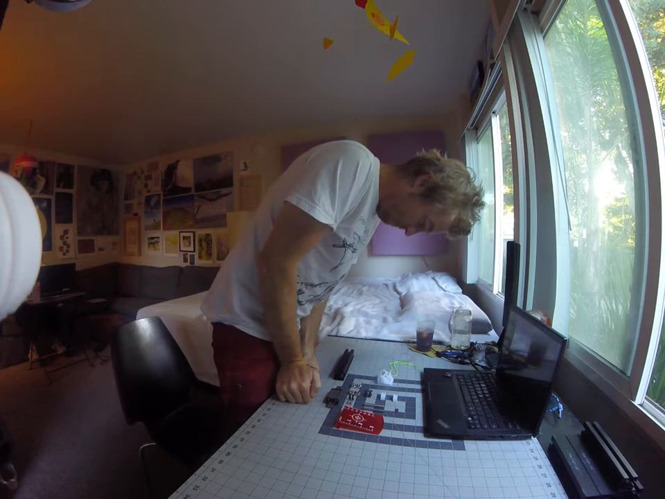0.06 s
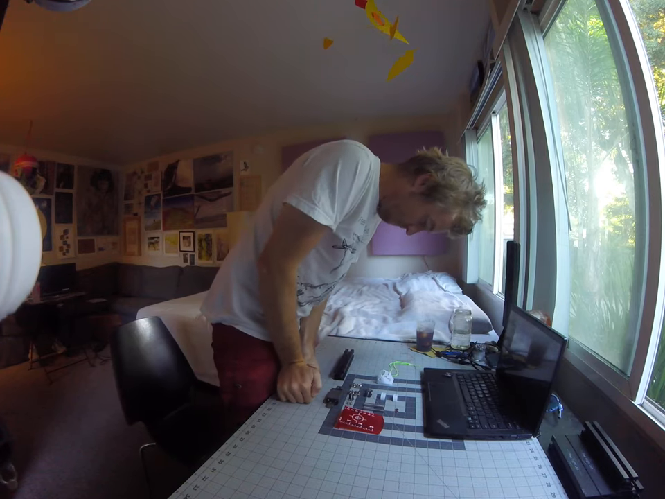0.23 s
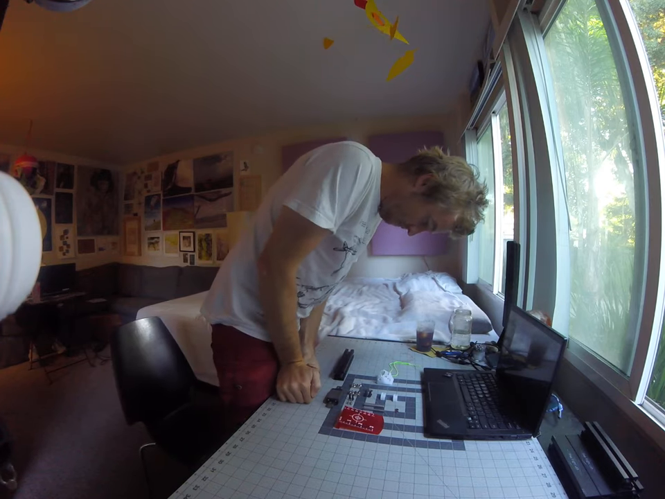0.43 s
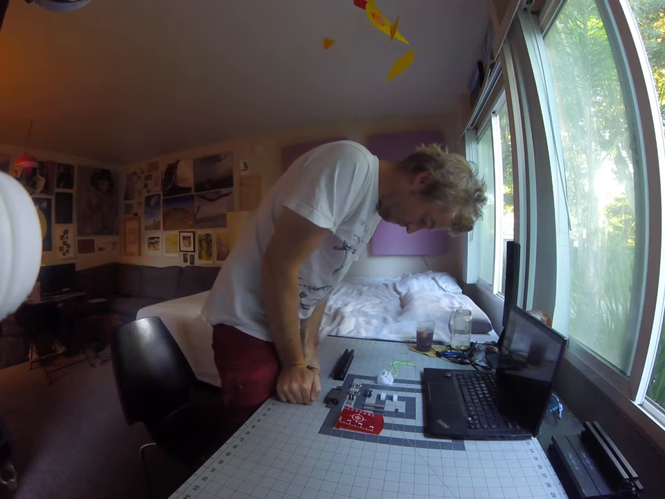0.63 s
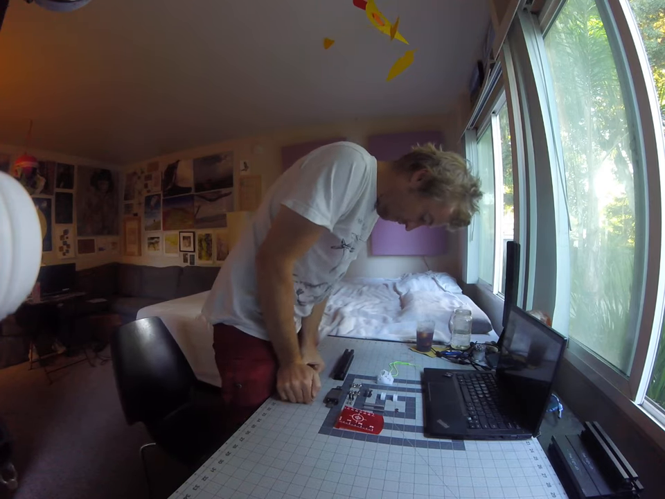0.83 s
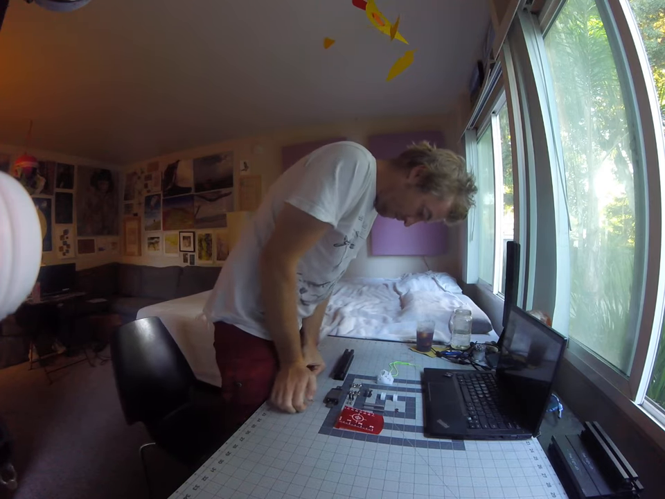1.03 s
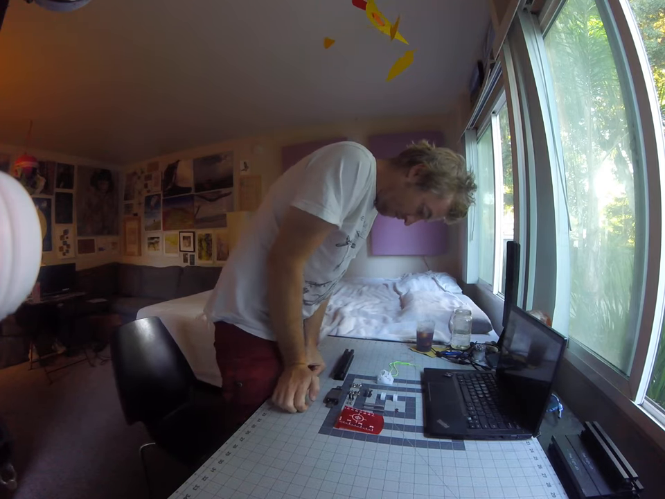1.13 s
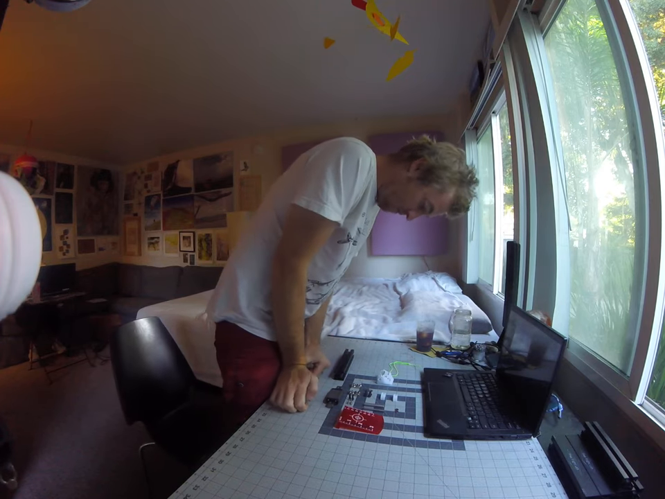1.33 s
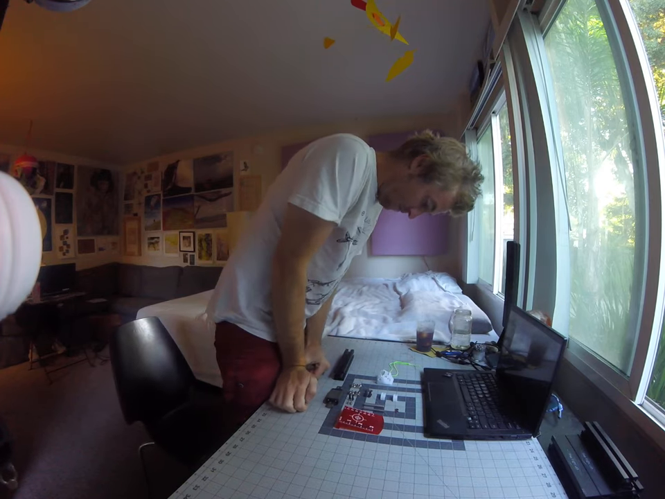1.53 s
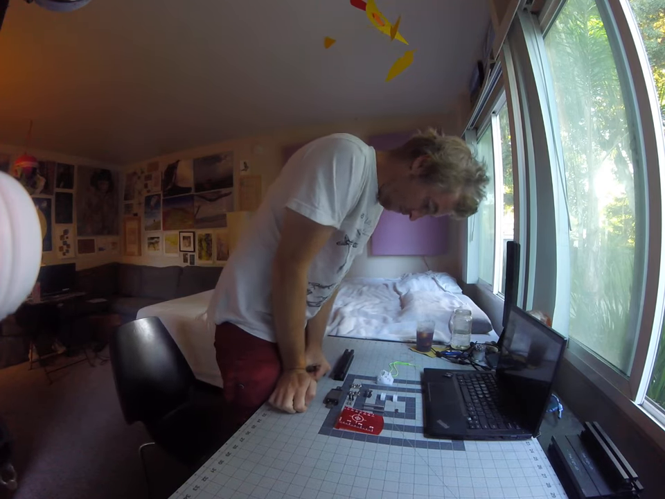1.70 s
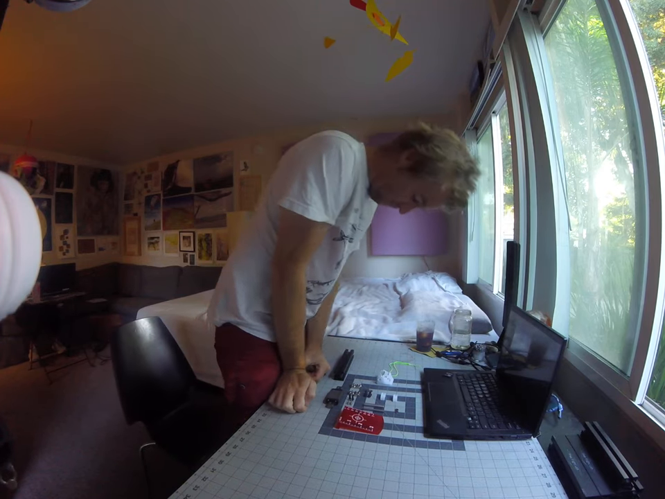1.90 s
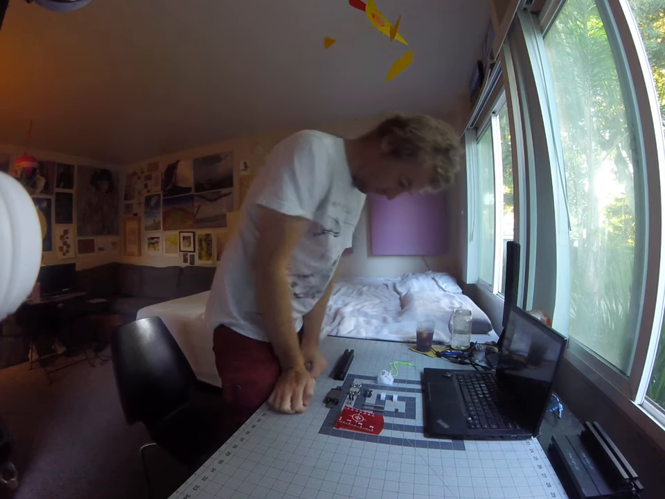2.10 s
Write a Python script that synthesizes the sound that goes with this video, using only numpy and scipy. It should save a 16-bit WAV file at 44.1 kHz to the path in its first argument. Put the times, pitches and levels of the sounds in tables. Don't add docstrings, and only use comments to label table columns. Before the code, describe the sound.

Dull deep thumps on a desk top as hands press a part home, with one sharp rattling snap

```python
import sys
import numpy as np
from scipy import signal
from scipy.fft import rfft, irfft
from scipy.io import wavfile
from scipy.ndimage import uniform_filter1d

SR = 44100
rng = np.random.default_rng(int(sys.argv[2]) if len(sys.argv) > 2 else 0)


def to_wav(sig):
    pcm = np.clip(np.atleast_2d(sig), -1, 1) * 32767
    pcm = np.round(pcm).astype(np.int16)
    wavfile.write(sys.argv[1], SR, pcm.T)


def voltage_ratio(level):
    return 10 ** (np.asarray(level, float) / 20)


N = 94815

# start in seconds, boom in dB, drum in dB, direction (-1 down, 1 up).
SHOVES = [(0.214, -19, -24.5, -1), (0.2246, -13, -18, -1), (0.268, -24, -27.5, 1), (0.324, -32, -33.5, 1),
          (0.432, -51, -58, 1), (0.558, -61, -36.5, 1), (.582, -31.5, -46, -1), (0.601, -64, -23, -1),
          (0.619, -20.5, -25, 1), (0.639, -20, -26.5, -1), (0.715, -29, -46, -1), (.79, -35.5, -41, 1),
          (0.839, -39.5, -68, -1), (0.974, -38.5, -37, 1), (1.031, -48, -62, 1), (1.117, -40, -36.5, 1),
          (1.137, -33, -41, -1), (1.42, -43, -48, 1), (1.566, -38, -38, 1), (1.585, -28, -34.5, -1),
          (1.627, -24.5, -34, 1), (1.648, -46, -30, -1), (1.659, -22, -27, 1), (1.718, -26.5, -55, -1),
          (1.739, -18.5, -17, 1), (1.744, -20.5, -49, -1), (1.798, -55, -36, 1)]
# pitch in Hz, level in dB, 60 dB decay in seconds.
BOOM_MODES = [(64.7, -3.5, 0.22), (65.2, 4, 0.093)]
# pitch in Hz, level in dB, 60 dB decay in seconds.
DRUM_MODES = [(126, 5, 0.059), (154, -23.5, 0.11)]
# start in seconds, level in dB, direction (-1 or 1).
SWAYS = [
    (0.222, -30, 1),
    (0.329, -35.5, 1),
    (0.635, -30, -1),
    (1.159, -40.5, -1),
    (1.402, -42.5, 1),
    (1.607, -37, -1),
    (1.694, -44, 1),
    (1.767, -28, 1),
    (1.908, -32.5, 1),
]
SWAY_HZ, SWAY_T60_S, SWAY_RISE_S = 29.58, 0.76, 0.0048
SHOVE_RISE_S, PALM_S = 0.0038, 0.0059

# start in seconds, level in dB, contact in milliseconds.
SNAP_HITS = [
    (.9741, -25, .13),
    (.9772, -33, .15),
    (.979, -27, .25),
    (.9813, -26, .2),
    (.987, -37, .2),
]
# pitch in Hz, level in dB, 60 dB decay in seconds.
PULLEY_MODES = [(410, -10, .025), (570, -2, .03), (795, -5, .03), (985, -5, .035), (1228, -3, .035),
                (1566, -12, .025), (1865, -15, .025), (2150, -14, .02), (2400, -16, .02), (2850, -19, .02),
                (5200, -26, .012)]
SNAP_DB, TICK_DB = -7.5, -2

# start in seconds, thud in dB, scrape in dB, scrape length in seconds,
# tone of the spot in Hz.
KNOCKS = [(0.2146, -32, -47, 0.015, 407), (.228, -39.5, -57, 0.042, 290), (0.597, -64, -56.5, 0.0091, 400),
          (0.608, -48, -53, 0.039, 400), (0.769, -42, -53.5, 0.0049, 546), (.79, -51, -63.5, 0.016, 450),
          (1.122, -59, -64.5, 0.031, 372), (1.583, -71, -68, 0.035, 400), (1.6538, -44, -49, 0.0074, 425),
          (1.738, -43.5, -60, 0.0058, 390), (1.76, -63, -60.5, 0.013, 900)]
# pitch in Hz, level in dB, 60 dB decay in seconds.
WOOD_MODES = [(285, -4, .07), (400, 0, .06), (460, -6, .05), (570, 0, .05), (630, -4, .05), (800, -8, .045),
              (960, -6, .045)]
# frequency in Hz, level in dB.
GRIT = [(400, -30), (750, 7.5), (1350, 3), (2000, -1), (3200, -9.5), (3700, -16), (5000, -39)]
BOUNCES_PER_S, BOUNCE_DB, BOUNCE_SPREAD_DB = 450, -5, 5
SPOT_DB_PER_OCT = 14
SCRAPE_RISE, SCRAPE_GRAIN_DB = 0.2, 2.5

# start in seconds, length in seconds, level
# in dB, start and end pitch in Hz.
CREAKS = [
    (0.034, 0.0079, -55, 1390, 1250),
    (0.268, 0.093, -54, 257.6, 227),
    (1.774, 0.047, -52.5, 228, 310),
]

# time in seconds, level in dB.
TREMOR_LEVEL = [
    (0.0, -60),
    (0.15, -55),
    (0.41, -47.5),
    (1.25, -50.5),
    (1.4, -54.5),
    (1.63, -81),
    (1.75, -24.5),
    (1.83, -41),
    (1.99, -49),
    (2.15, -53.5),
]
# centre in Hz, width in Hz, level in dB.
TREMOR_BODY = [(27.8, 11.5, -4), (65.7, 12, 4.5), (131, 31.4, -22), (250, 20, -29)]

# frequency in Hz, 60 dB decay in seconds.
ROOM_DECAY = [(200, 0.85), (1000, 0.1), (3000, 0.24), (8000, 0.033)]
ROOM_DB, ROOM_THIN_HZ = -9.5, 450
# frequency in Hz, gain in dB.
HOUSING = [(0, 13.5), (2800, 0), (3700, -4), (5600, 10), (6500, 16), (8000, -5.5), (10000, -34.5)]
# frequency in Hz, level in dB per Hz.
ROOM_HISS = [(24, -26), (40, 5), (150, -7), (205, -13.5), (286, -15.5), (484, -21), (1070, -23),
             (4200, -35), (5460, -66), (9240, -120)]
ROOM_HISS_DB = -64.5
# frequency in Hz, level in dB per Hz.
CAPSULE_HISS = [(4200, -20), (5900, -14.5), (6350, -3), (6750, -4), (7500, -9), (9500, -14), (10500, -21),
                (12000, -15), (14500, -29)]
CAPSULE_DB, EDGE_HZ = -65.5, 14500


def evened(x):
    return x / np.sqrt(np.mean(x ** 2) + 1e-20)


def read(points, hz):
    f, value = np.transpose(points)
    return np.interp(np.log(hz + 1), np.log(f + 1), value)


def add(mix, s, sound):
    part = mix[round(s * SR):][:len(sound)]
    part += sound[:len(part)]


def ring(modes, rise_s, size=SR):
    t = np.arange(size) / SR
    tones = sum(voltage_ratio(db - 60 * t / t60) * np.sin(2 * np.pi * hz * t) for hz, db, t60 in modes)
    return (1 - np.exp(-t / rise_s)) * tones


def noise(colour, lo_hz, hi_hz):
    hz = np.fft.rfftfreq(N, 1 / SR)
    z = rfft(rng.standard_normal(N)) * voltage_ratio(colour(hz))
    inside = (hz > lo_hz) * (hz < hi_hz)
    return irfft(z, N) / np.std(irfft(z * inside, N))


def desk():
    out = np.zeros(N)
    boom = ring(BOOM_MODES, SHOVE_RISE_S)
    drum = ring(DRUM_MODES, SHOVE_RISE_S / 2)
    for s, boom_db, drum_db, way in SHOVES:
        add(out, s, np.sign(way) * (voltage_ratio(boom_db) * boom + voltage_ratio(drum_db) * drum))
    sway = ring([(SWAY_HZ, 0, SWAY_T60_S)], SWAY_RISE_S, size=2 * SR)
    for s, db, way in SWAYS:
        add(out, s, np.sign(way) * voltage_ratio(db) * sway)
    palm = np.hanning(round(PALM_S * SR))
    return signal.oaconvolve(out, palm / palm.sum(), "same")


def snap():
    out = np.zeros(N)
    ms = np.arange(SR // 100) / SR * 1000
    body = ring(PULLEY_MODES, 0.0001, size=SR // 4)
    body[[0, 8, 30]] += voltage_ratio(TICK_DB) * np.array([-6, 20, -10])
    for s, db, contact_ms in SNAP_HITS:
        pulse = ms ** 2 * np.exp(-2 * ms / contact_ms)
        add(out, s, -voltage_ratio(db + SNAP_DB) * np.convolve(body, pulse / pulse.sum()))
    return out


def knocks():
    thud, effort = np.zeros(N), np.zeros(N)
    luck = rng.random((len(KNOCKS), 3, 40))
    t = np.arange(SR // 8) / SR
    for (s, thud_db, scrape_db, length, spot_hz), (when, size, way) in zip(KNOCKS, luck):
        hits = np.zeros(len(t))
        at = (np.cumsum(0.3 + 1.4 * when) * SR / BOUNCES_PER_S).astype(int)
        bounce_db = BOUNCE_DB + BOUNCE_SPREAD_DB * np.log(size + 0.021) - 20 * (at / SR / length) ** 2
        hits[at] = np.sign(way - 0.5) * voltage_ratio(bounce_db)
        hits[0] = -1
        wood = [(hz, db - SPOT_DB_PER_OCT * abs(np.log2(hz / spot_hz)), t60) for hz, db, t60 in WOOD_MODES]
        add(thud, s, voltage_ratio(thud_db) * signal.fftconvolve(hits, ring(wood, 0.001, size=SR // 4)))
        rise = np.minimum(t / (SCRAPE_RISE * length), 1)
        add(effort, s, voltage_ratio(scrape_db - 10 * (t / length) ** 1.6) * rise)
    grain = voltage_ratio(SCRAPE_GRAIN_DB * evened(uniform_filter1d(rng.standard_normal(N), size=80)))
    grit = noise(lambda hz: read(GRIT, hz), lo_hz=400, hi_hz=3450)
    return thud + effort * grain * grit


def creaks():
    out = np.zeros(N)
    for s, length, db, start_hz, end_hz in CREAKS:
        u = np.arange(0, 1, 1 / (length * SR))
        turns = np.cumsum(start_hz + (end_hz - start_hz) * u) / SR
        add(out, s, voltage_ratio(db) * np.sin(np.pi * u) * np.sin(2 * np.pi * turns))
    return out


def tremor():
    def colour(hz):
        return 10 * np.log10(sum(voltage_ratio(db) ** 2 / (1 + (2 * (hz - f) / w) ** 4) for f, w, db in TREMOR_BODY))
    s, db = np.transpose(TREMOR_LEVEL)
    effort = voltage_ratio(np.interp(np.arange(N) / SR, s, db))
    return effort * noise(colour, lo_hz=46.7, hi_hz=91)


def room(x):
    hz, t, z = signal.stft(rng.standard_normal(SR // 2), SR, nperseg=256)
    decay = voltage_ratio(-60 * t / read(ROOM_DECAY, hz)[:, None])
    thin = (hz / np.hypot(hz, ROOM_THIN_HZ))[:, None] ** 2
    tail = signal.istft(z * decay * thin, SR, nperseg=256)[1]
    tail = np.r_[np.zeros(SR // 300), tail]
    return signal.fftconvolve(x, tail / np.linalg.norm(tail))[:N]


def housing(x):
    hz = np.linspace(0, SR / 2, 200)
    taps = signal.minimum_phase(signal.firwin2(255, hz, voltage_ratio(2 * read(HOUSING, hz)), fs=SR))
    return signal.oaconvolve(x, taps)[:N]


def room_hiss():
    return voltage_ratio(ROOM_HISS_DB) * noise(lambda hz: read(ROOM_HISS, hz) - 60 * (hz > 4200), lo_hz=300, hi_hz=3500)


def capsule_hiss():
    def colour(hz):
        return read(CAPSULE_HISS, hz) - 60 * (hz < 4200)
    return voltage_ratio(CAPSULE_DB) * noise(colour, lo_hz=4200, hi_hz=15000)


def scene():
    soft, hard = knocks() + creaks(), snap()
    near = housing(soft + hard + voltage_ratio(ROOM_DB) * (room(soft) + room(hard)))
    return (desk() + tremor() + near + room_hiss())[None]


def top_cut(x):
    return signal.sosfilt(signal.butter(12, 14670, fs=SR, output="sos"), x)


def record(dry):
    edge = signal.firwin(255, EDGE_HZ, fs=SR)[None]
    mix = signal.oaconvolve(dry + capsule_hiss(), edge, "same")
    return top_cut(mix)


dry = scene()
out = record(dry)
to_wav(out)
```